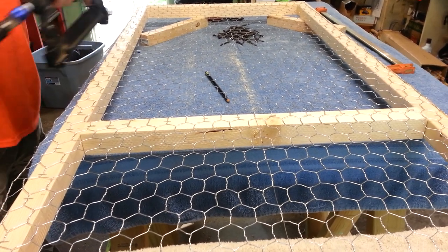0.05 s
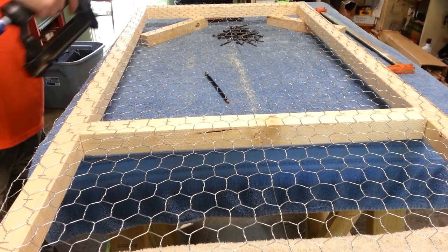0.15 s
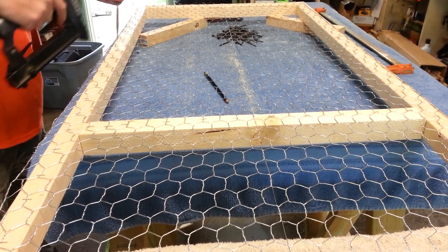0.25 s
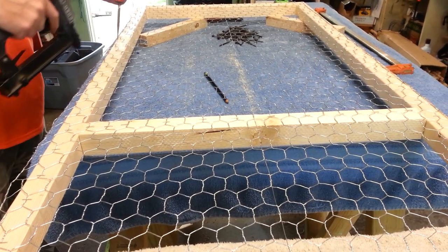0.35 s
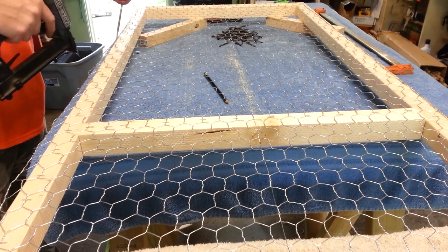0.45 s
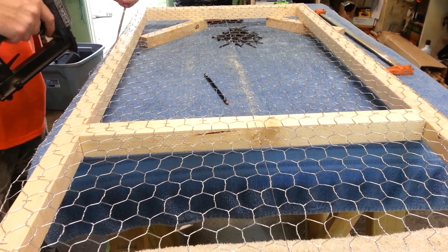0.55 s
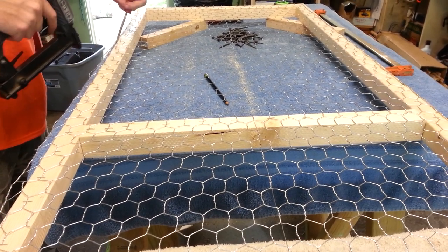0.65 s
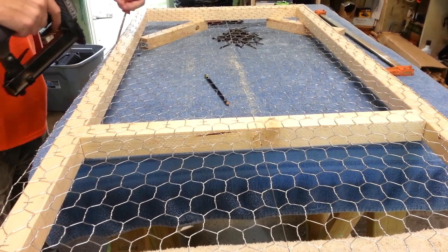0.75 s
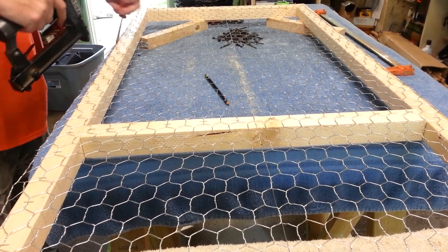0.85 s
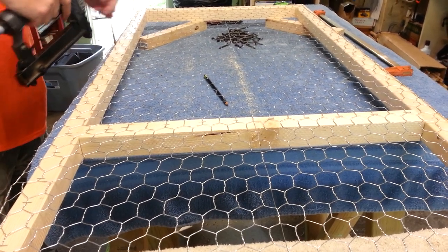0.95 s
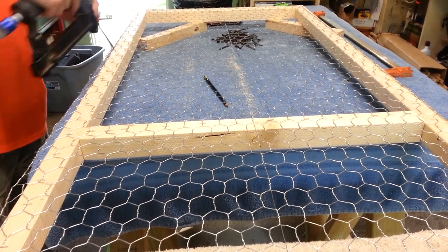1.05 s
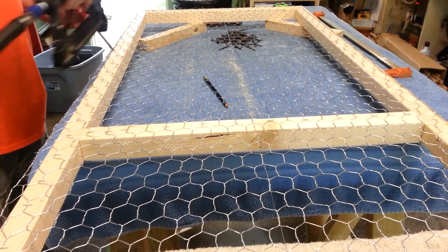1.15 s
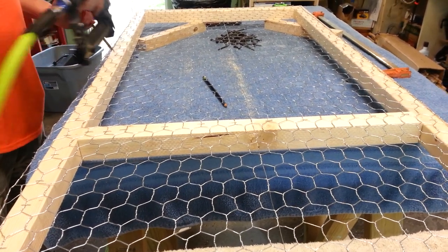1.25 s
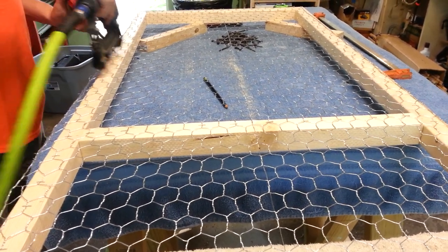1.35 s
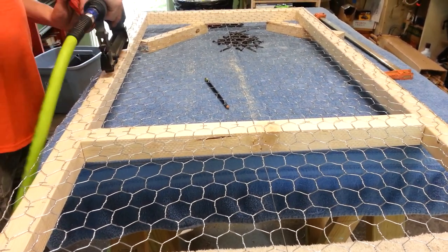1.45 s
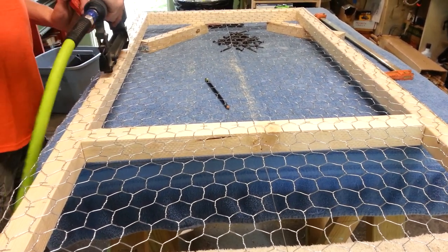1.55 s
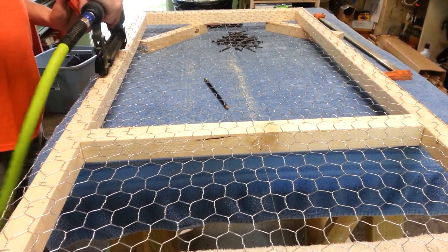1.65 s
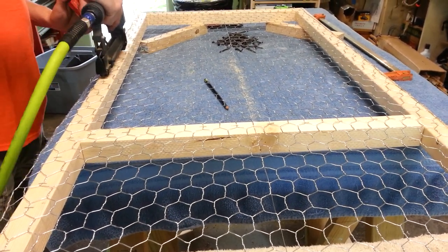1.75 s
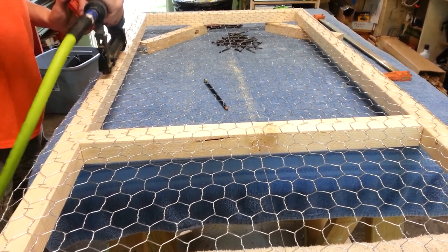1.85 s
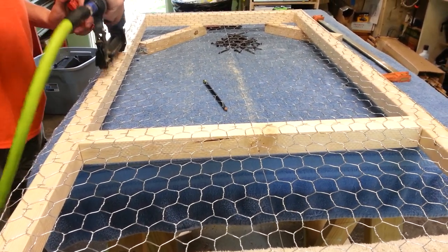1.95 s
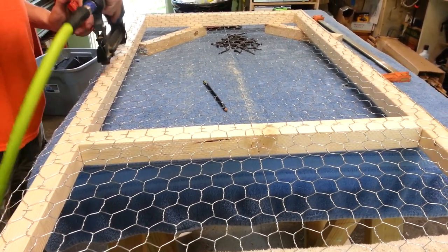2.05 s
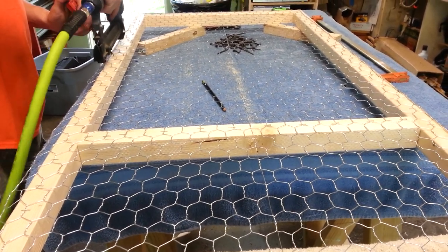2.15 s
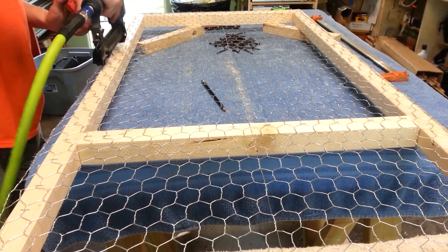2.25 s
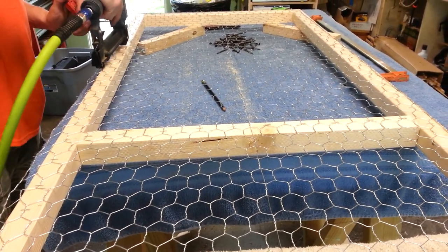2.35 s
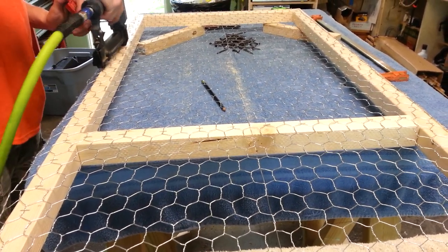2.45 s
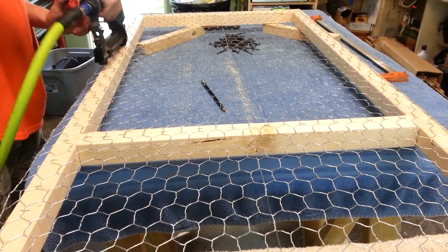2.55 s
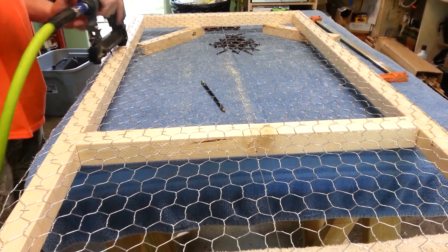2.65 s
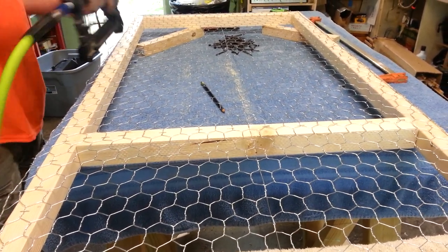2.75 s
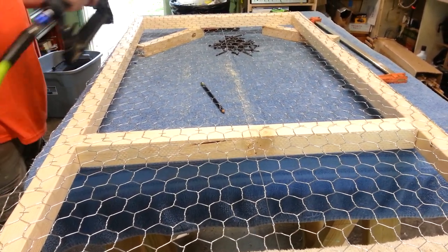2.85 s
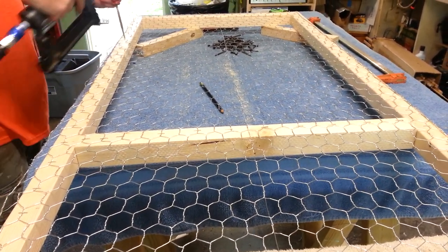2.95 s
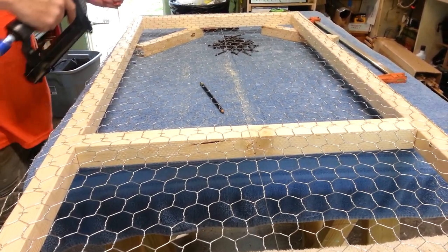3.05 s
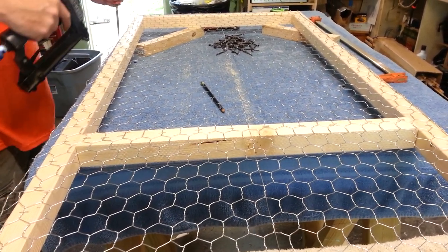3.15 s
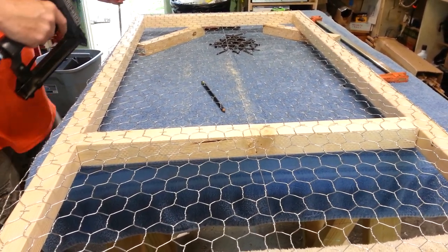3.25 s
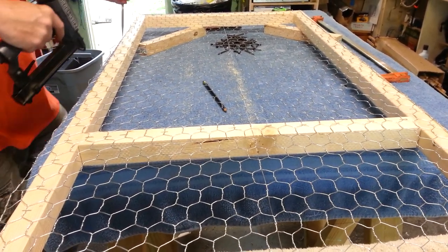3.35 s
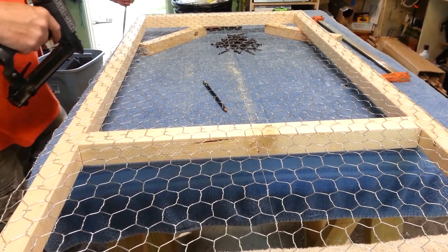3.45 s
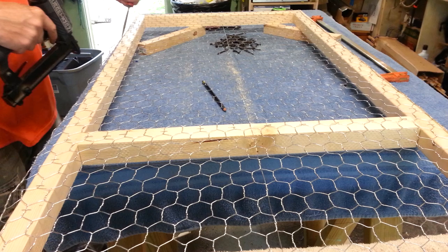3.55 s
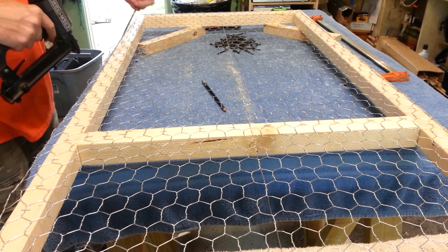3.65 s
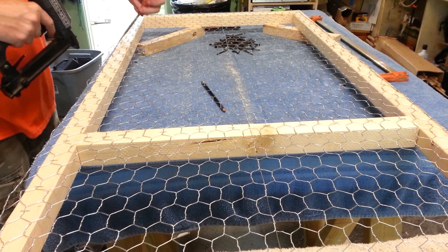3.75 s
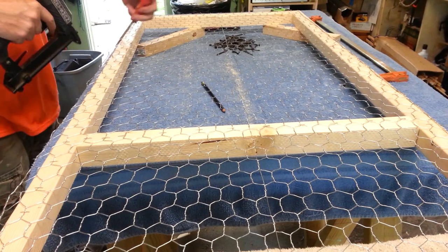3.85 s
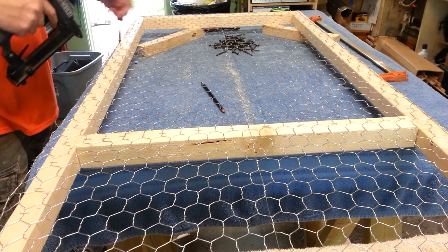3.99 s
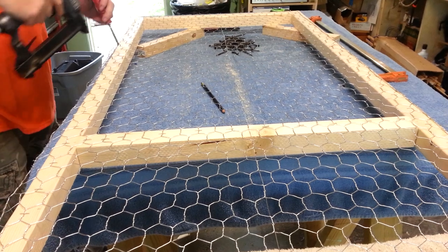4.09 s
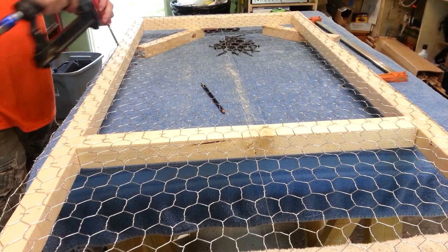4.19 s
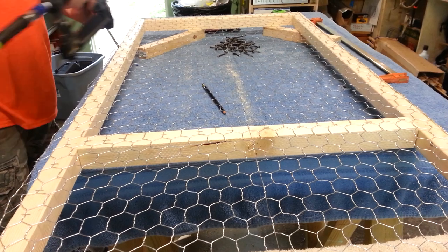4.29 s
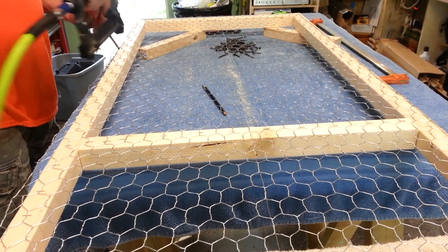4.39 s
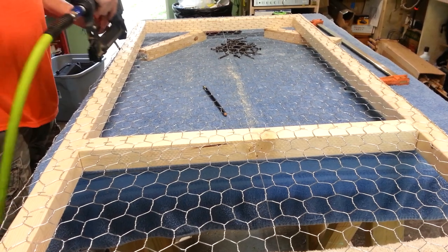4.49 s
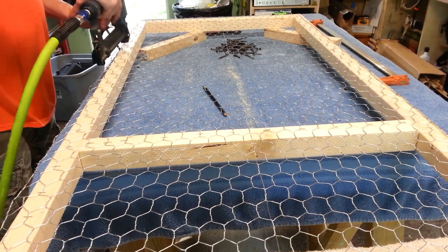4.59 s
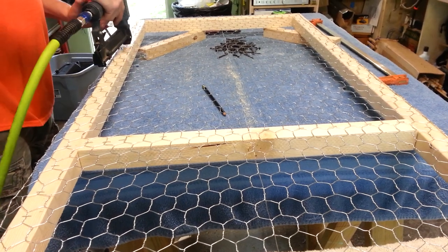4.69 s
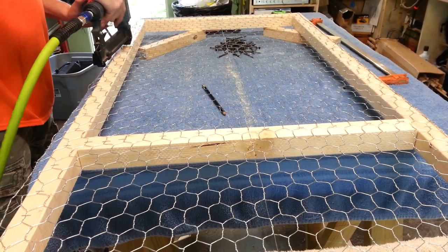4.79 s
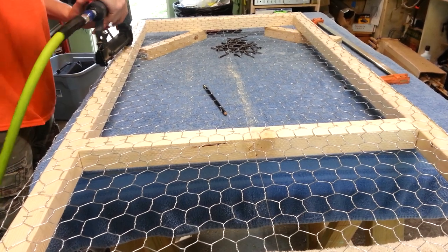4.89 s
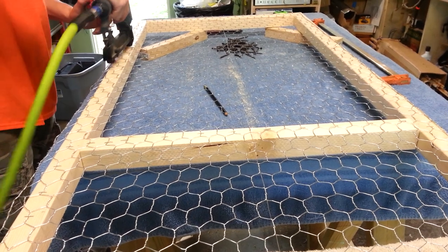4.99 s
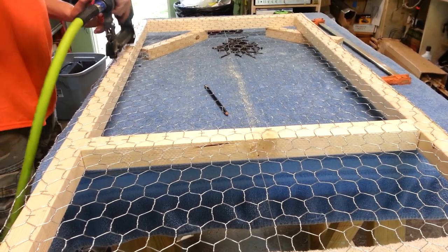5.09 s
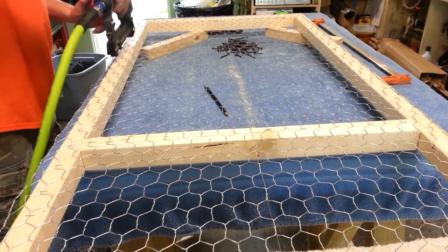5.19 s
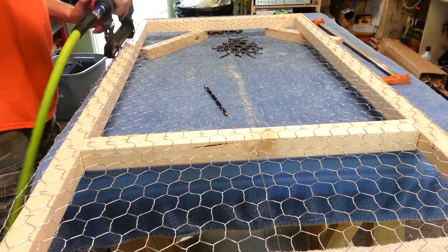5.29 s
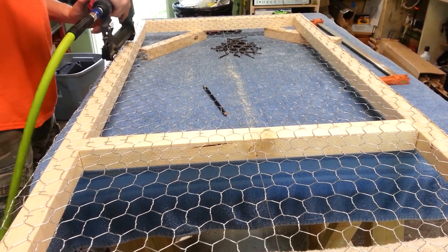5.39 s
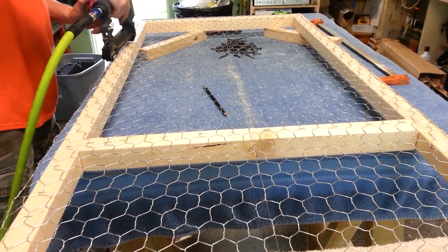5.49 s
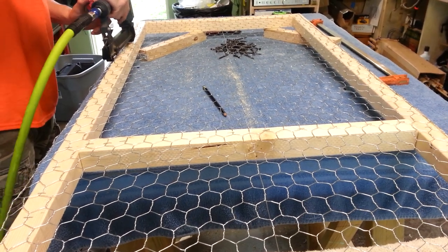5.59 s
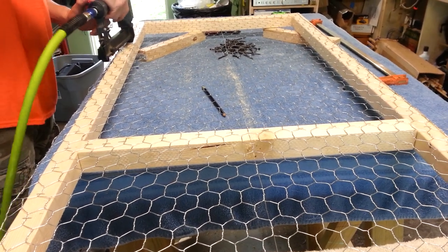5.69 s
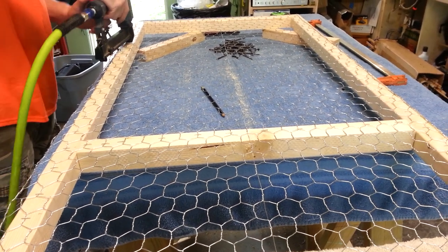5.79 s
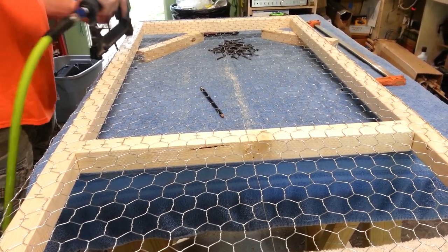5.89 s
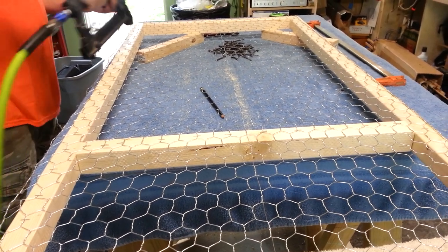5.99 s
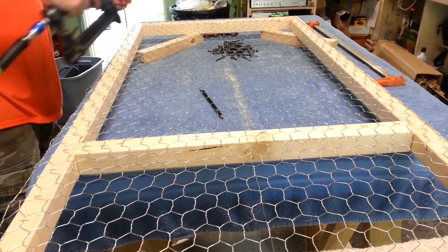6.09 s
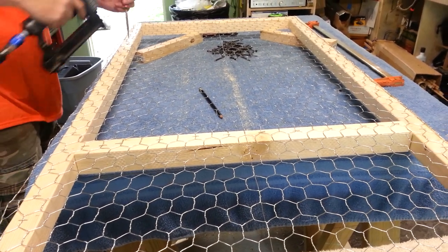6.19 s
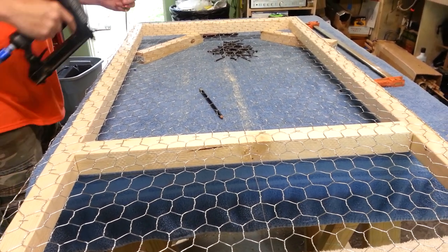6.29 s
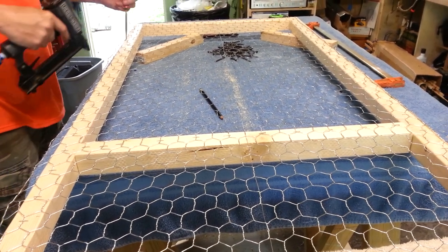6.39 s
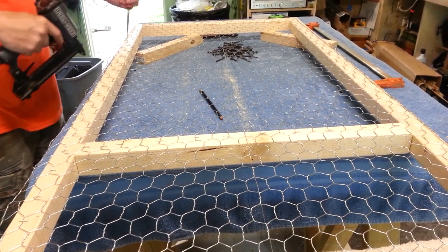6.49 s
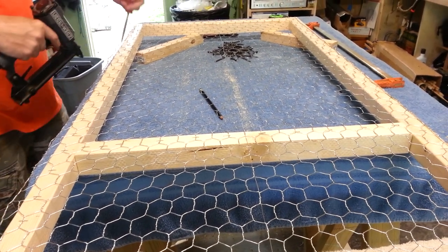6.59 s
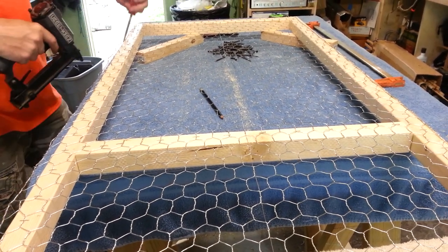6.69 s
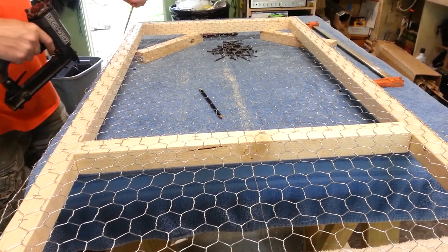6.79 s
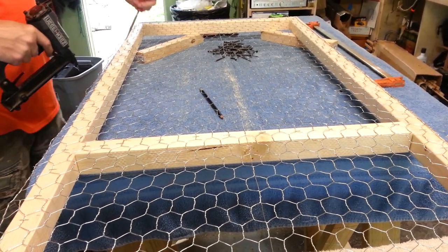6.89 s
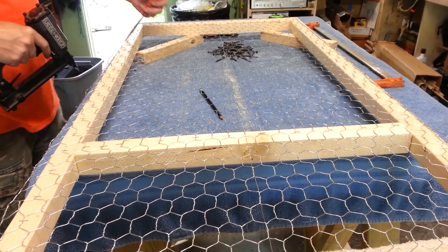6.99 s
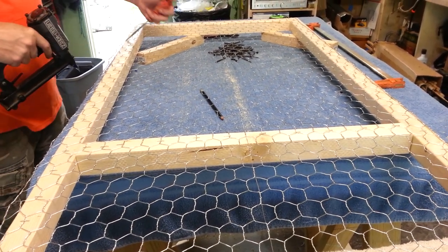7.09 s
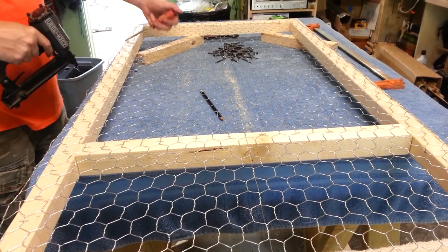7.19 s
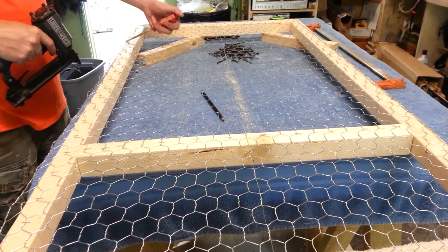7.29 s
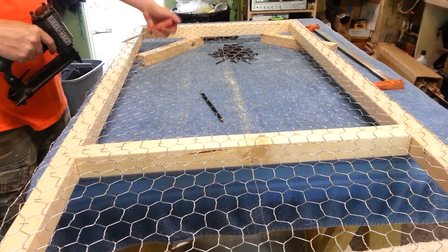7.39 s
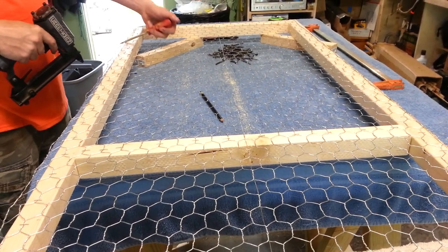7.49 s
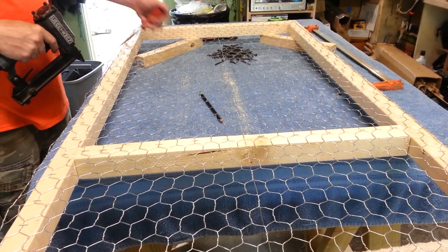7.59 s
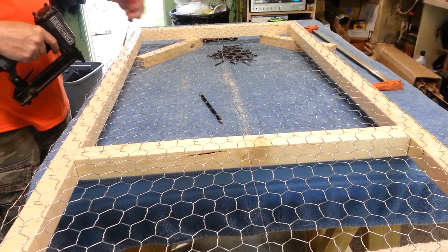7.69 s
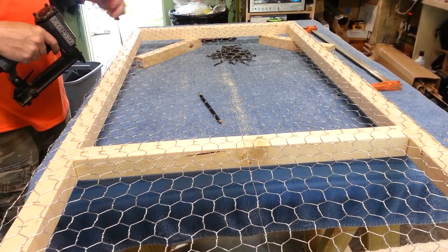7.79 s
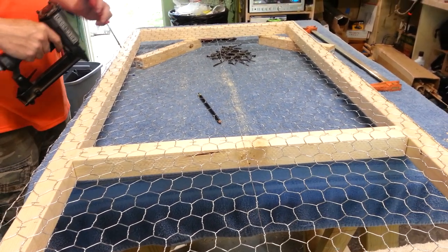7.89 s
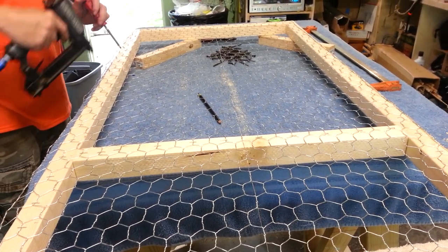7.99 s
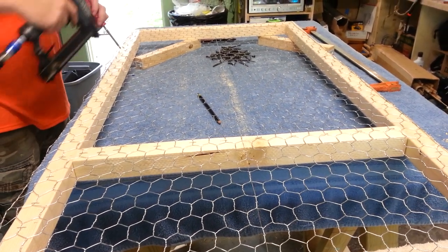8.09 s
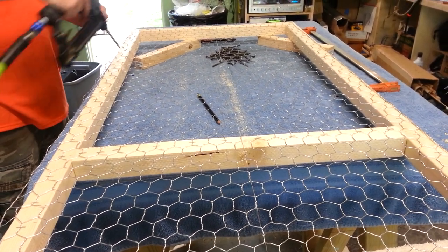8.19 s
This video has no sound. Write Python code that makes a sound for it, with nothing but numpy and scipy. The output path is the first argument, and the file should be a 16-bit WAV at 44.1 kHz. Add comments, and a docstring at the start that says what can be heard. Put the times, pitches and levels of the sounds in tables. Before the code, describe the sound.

A light click and a soft scrape of chicken wire on wood come first. An air stapler then fires two loud shots, each a hard metallic bang followed by a clack and a puff of air. The wire rasps as it is pulled tight, two more shots follow, and the mesh slips again near the end. The small workshop echoes briefly over a faint low drone, with the work slightly left of a stereo microphone.

```python
"""A light click and the scrape of chicken wire come first, then an air stapler bangs four times. It is tacking
the wire to a wooden frame in a small workshop, a little left of a stereo microphone. Each shot is a spit of the
valve, a blow so loud it clips, then a clack and a puff of air as the piston returns. Between shots the mesh is
pulled tight, slipping and rasping over the wood, a pry tool knocks on the frame, and the tool clicks as it is
handled. The timber rings, the room echoes, and a low drone lies underneath."""
import sys
import numpy as np
from scipy import signal
from scipy.fft import rfft, irfft
from scipy.io import wavfile
from scipy.ndimage import uniform_filter1d

SR = 44100
rng = np.random.default_rng(int(sys.argv[2]) if len(sys.argv) > 2 else 0)


def store_pcm(level_fs):
    """Save levels as 16-bit WAV."""
    pcm = np.round(np.clip(level_fs, -1, 1) * 32767).astype(np.int16)
    wavfile.write(sys.argv[1], SR, np.atleast_2d(pcm).T)


N = 363384

# When each staple goes in: nose_press_s, blow_s, piston_return_s
SHOTS = [(1.820, 1.9082, 2.0168), (2.489, 2.5592, 2.6686), (4.893, 4.9828, 5.0928), (5.585, 5.7420, 5.8366)]
def stapler(lead_s=0.0156, seat_s=0.024):
    """Each shot spits, bangs and puffs; the piston clacks as it lets go and again as it seats."""
    out = np.zeros(N)
    for _, blow_s, return_s in SHOTS:
        add(out, blow_s - lead_s, at_level(valve(lead_s), db=-14))
        add(out, blow_s, at_level(blow(), db=5))
        add(out, return_s, at_level(exhaust(), db=-3.5))
        add(out, return_s, piston(clack_db=-9.5, thump_db=-9))
        add(out, return_s + seat_s, piston(clack_db=-4, thump_db=-15))
    return out


# The notes the stapler's metal body rings with: pitch_hz, level_db, fade_s
BODY_NOTES = [(470, -6.5, 0.064), (1040, 0.5, 0.12), (1297, -6, .12), (1390, -16, 0.34), (1920, 0.5, 0.22),
              (2010, 1, 0.21), (2250, 2, 0.25), (2485, -0.5, 0.24), (2615, 2.5, .19), (2796, -9, 0.43),
              (2860, -4, .19), (3090, -3.5, .17), (3828, -10, .17)]
# The tone of rattling steel parts: pitch_hz, level_db
STEEL_TONE = [(40, -43), (100, -27), (200, -22), (450, -24), (750, -20), (1200, -2), (1900, 2), (2700, 4.5),
              (4500, -9), (7000, -17), (14000, -23)]
def blow(contact_s=0.00015):
    """The driver hits staple and wood: one hard push, a rattle of parts, and the ring of the body."""
    t = clock(0.5)
    push = band(t / contact_s * np.exp(-t / contact_s), 440, 3000, order=1)
    rattle = colour(rng.standard_normal(len(t)) * fade(t, 0.18), STEEL_TONE)
    ring = 0
    for hz, db, fade_s in BODY_NOTES:
        louder, sharper, phase = rng.standard_normal(3)  # no two blows ring alike
        note = np.sin(2 * np.pi * hz * (1 + 0.0065 * sharper) * t + np.pi * phase)
        ring += amp(db + 2 * louder) * note * fade(t, fade_s)
    return at_level(rattle, db=0) + at_level(ring, db=-12) - at_level(push, db=-2)


# The tone of air spitting through the valve: pitch_hz, level_db
VALVE_TONE = [(100, -4), (500, -6), (900, -11), (2000, -2.5), (3200, 4.5), (4500, -11.5), (7000, -3),
              (14000, -7.5)]
def valve(lead_s, rise_s=0.0003):
    """The trigger valve spits while the cylinder fills."""
    t = clock(lead_s + 0.0012)
    opening = 1 - np.exp(-(t / rise_s) ** 2)
    return colour(rng.standard_normal(len(t)) * opening, VALVE_TONE)


# The tone of the escaping air: pitch_hz, level_db
EXHAUST_TONE = [(100, -21), (400, -14), (800, -10.5), (1500, -1), (3000, 3), (4400, 0), (5500, -7.5),
                (8000, -1), (14000, -6)]
def exhaust(rise_s=0.00053, hold_s=0.0048, empty_s=0.19):
    """The cylinder empties: a jet of air holds briefly, then dies with its pressure."""
    t = clock(0.4)
    pressure = rise(t, rise_s) * fade(np.maximum(t - hold_s, 0), empty_s)
    return colour(rng.standard_normal(len(t)) * pressure, EXHAUST_TONE)


# The tone of the piston's dull thump: pitch_hz, level_db
THUMP_TONE = [(40, -19.5), (90, -9), (150, 0.5), (210, 0), (300, -6), (420, -4.5), (800, -18),
              (3000, -26.5)]
def piston(clack_db, thump_db):
    """The piston knocks and chatters briefly: a bright clack on top of a dull thump."""
    t = clock(0.2)
    knock = t == 0
    clack = colour(knock + amp(-13) * rng.standard_normal(len(t)) * fade(t, 0.02), STEEL_TONE)
    thump = colour(knock + amp(-30) * rng.standard_normal(len(t)) * fade(t, 0.015), THUMP_TONE)
    return at_level(clack, clack_db) + at_level(thump, thump_db)


# The tone of wire mesh on wood: pitch_hz, level_db
MESH_TONE = [(60, -28), (180, -6), (330, -4.5), (480, -2.5), (760, -5), (1100, 1), (1600, -0.5),
             (2300, -8.5), (3200, -2.5), (3800, -14), (4400, -10), (5500, -25), (9000, -29.5),
             (14000, -42.5)]
# Each slip of the wire, or knock of the pry tool on the frame: start_s, level_db, brightness_db_per_octave
SLIPS_AND_KNOCKS = [(.487, -34.5, 0.5), (.58, -38, -1.5), (.672, -34.5, -3.5), (.851, -26.5, 2),
                    (1.122, -42.5, 6), (3.428, -37, 4.5), (3.556, -34.5, 4), (3.637, -39.5, -0.5),
                    (3.673, -36.5, 0), (3.777, -28, 0.1), (3.825, -24, -0.5), (4.4, -42.5, 2),
                    (5.984, -23.5, 3.5), (6.957, -40, 0.5), (7.24, -29, 4), (7.253, -23, -2.5),
                    (7.433, -21.5, -1), (7.49, -28, -4), (7.691, -38, 1.5)]
def slips_and_knocks():
    """The tight wire slips and snaps against the frame, and the pry tool knocks on the timber."""
    return knocks(SLIPS_AND_KNOCKS, MESH_TONE, fade_s=0.088, rise_s=0.00054, spread_db=5.5)


# Each drag of the mesh over the wood: start_s, length_s, level_db
WIRE_RASPS = [(.64, 0.057, -39.5), (.86, 0.0472, -23), (3.837, 0.091, -19)]
def wire_rasps(rise_s=0.0018, swell_db_per_s=40, stop_s=0.23):
    """Twists of wire catch and let go on the timber, harder as the pull grows."""
    out, t = np.zeros(N), clock(0.35)
    for start_s, length_s, db in WIRE_RASPS:
        pull = rise(t, rise_s) * amp(swell_db_per_s * np.minimum(t, length_s))
        release = fade(np.maximum(t - length_s, 0), stop_s)
        rasp = colour(grains(t, spread_db=6) * pull * release, tilted(MESH_TONE, 0.3))
        add(out, start_s, at_level(rasp, db))
    return out


# The tone of small clicks and ticks: pitch_hz, level_db
CLICK_TONE = [(59, -14), (100, -9.5), (211, 1.5), (698, -8.5), (1250, -0.5), (1850, -8), (2620, -3),
              (4310, -11.5), (6790, -19.5), (14000, -22.5)]
# Each click of the tool in the hand: start_s, level_db, brightness_db_per_octave
TOOL_CLICKS = [(.002, -25.5, 0), (.286, -39, -3.5), (1.46, -30, 0.5), (1.834, -32.5, -1), (2.352, -41, 1),
               (2.366, -38, 5), (2.386, -37.5, 2.5), (3.047, -32.5, -5.5), (3.224, -38, -1),
               (3.525, -37.5, -3.5), (4.774, -36.5, -0.5), (5.383, -34, -2), (6.27, -39, -3.5),
               (6.931, -38, -4)]
def tool_clicks(nose_db=-34):
    """The tool clicks as it is handled, and as its nose meets the wood before each shot."""
    presses = [(press_s, nose_db, 0) for press_s, _, _ in SHOTS]
    return knocks(TOOL_CLICKS + presses, CLICK_TONE, fade_s=0.017, rise_s=0.00055, spread_db=4.5)


def mesh_rustle(level_db=(-48, -42), tilt_db=(-3, 3), count=50):
    """The loose mesh ticks faintly at random moments as it is handled."""
    ticks = [(rng.uniform(0, (N - 1) / SR), rng.uniform(*level_db), rng.uniform(*tilt_db))
             for _ in range(count)]
    return knocks(ticks, CLICK_TONE, fade_s=0.0386, rise_s=0.00068, spread_db=6)


# The notes the wooden frame rings with: pitch_hz, gain_db, fade_s
FRAME_NOTES = [(152.5, -7, .55), (205, 9, 1), (488, 4.5, 0.76)]
def with_frame(x, gain_db):
    """Every knock sets the timber ringing; return the sound together with that ring."""
    t, ring = clock(0.7), 0
    for hz, db, fade_s in FRAME_NOTES:
        dying = fade(t, fade_s)
        ring += amp(db) * np.sin(2 * np.pi * hz * t) * dying * 2 / dying.sum()
    return x + amp(gain_db) * signal.oaconvolve(x, ring)[:N]


# How long the room rings, from bass to treble: pitch_hz, fade_s
ROOM_FADES = [(120, 0.58), (400, 0.58), (1200, 0.44), (3000, 0.35), (6000, 0.29), (13000, 0.16)]
def room_echo(early_fade_s=0.13, tail_db=-6.5, build_s=0.0076):
    """Quick echoes off the bench and shelves, then the room's tail; the deep bass escapes."""
    t = clock(0.9)
    hz, fades_s = np.transpose(ROOM_FADES)
    log_hz = np.log(np.fft.rfftfreq(len(t), 1 / SR) + 1)
    spectrum, tail = rfft(all_around(len(t))), 0
    for share, fade_s in zip(np.eye(len(hz)), fades_s):  # each pitch range fades at its own speed
        tail += irfft(spectrum * np.interp(log_hz, np.log(hz), share), len(t)) * fade(t, fade_s)
    early = all_around(len(t)) * fade(t, early_fade_s) * (t > 0.001)
    parts = [(early, 0), (tail * rise(t, build_s), tail_db)]
    echo = sum(x * amp(db) / np.sqrt(np.sum(x ** 2) / 2) for x, db in parts)
    return band(echo, 120, SR / 2, order=2)


def workshop(sources):
    """Sounds reach the left ear first; their echoes change as the work moves along the frame."""
    out, to_room = 0, 0
    for x, lag_s, echo_db in sources:
        left = x / np.hypot(1, amp(echo_db))  # direct sound and echo share the energy
        right = np.pad(left, (int(lag_s * SR), 0))[:N]
        out += np.array([left, right])
        to_room += amp(echo_db) * left
    for share in np.eye(len(SHOTS)):  # one echo pattern per shot, blending into the next
        nearness = np.sqrt(np.interp(np.arange(N) / SR, [s for _, s, _ in SHOTS], share))
        out += signal.oaconvolve((to_room * nearness)[None], room_echo(), axes=1)[:, :N]
    return out


# The tone of the workshop's low drone: pitch_hz, level_db
DRONE_TONE = [(18, -73), (30, -44.5), (60, -28), (173, -6.5), (257, -14.5), (286, -15.5), (513, -15.5),
              (731, -17.5), (1430, -20.5), (2300, -19), (2720, -20.5), (4400, -23), (5720, -30)]
def background(drone_db=-48.5, waver_db=2, hiss_db=-59):
    """A low drone that wavers slightly, under a thin hiss."""
    drift = np.interp(np.arange(N), np.linspace(0, N, 60), rng.standard_normal(60))
    drone = np.array([colour(x, DRONE_TONE) for x in all_around(N)])
    drone = signal.sosfilt(signal.butter(8, 4600, fs=SR, output="sos"), drone)
    return drone / drone.std() * amp(drone_db + waver_db * drift) + amp(hiss_db) * all_around(N)


def knocks(rows, tone, fade_s, rise_s, spread_db):
    """Small knocks: each is a brief chatter with its own level and brightness."""
    out, t = np.zeros(N), clock(0.15)
    for start_s, db, tilt_db in rows:
        chatter = grains(t, spread_db) * rise(t, rise_s) * fade(t, fade_s)
        add(out, start_s, at_level(colour(chatter, tilted(tone, tilt_db)), db, samples=800))
    return out


def grains(t, spread_db):
    """Gritty noise: many tiny contacts of very unequal size."""
    x = rng.standard_normal(len(t)) * amp(spread_db * np.minimum(rng.exponential(size=len(t)), 5))
    return x / x.std()


def all_around(length, spacing_m=0.097):
    """Noise from all sides: left and right are alike in the bass, unrelated in the treble."""
    likeness = 0.75 * np.sinc(2 * np.fft.rfftfreq(length, 1 / SR) * spacing_m / 343)
    spectra = rfft(rng.standard_normal((2, length)))
    mid, side = irfft(spectra * np.sqrt([1 + likeness, 1 - likeness]), length)
    return np.array([mid + side, mid - side]) / np.sqrt(2)


def colour(x, tone, size=2048):
    """Turn each pitch of a sound up or down as a tone table says."""
    hz, db = np.transpose(tone)
    gain = amp(np.interp(np.log(np.fft.rfftfreq(size, 1 / SR) + 1), np.log(hz), db))
    cepstrum = irfft(np.log(gain))[:size // 2]  # one half only, so nothing rings before the hit
    cepstrum[1:] *= 2
    return signal.fftconvolve(x, irfft(np.exp(rfft(cepstrum, size))))[:len(x)]


def tilted(tone, tilt_db, low_hz=222, high_hz=4440):
    """The same tone, brighter or duller by tilt_db per octave."""
    return [(hz, db + tilt_db * np.log2(np.clip(hz, low_hz, high_hz) / low_hz)) for hz, db in tone]


def band(x, low_hz, high_hz, order):
    """Keep the pitches between two limits."""
    edges_hz = [low_hz, min(high_hz, SR / 2 - 1)]
    return signal.sosfilt(signal.butter(order, edges_hz, "band", fs=SR, output="sos"), x)


def amp(db):
    """Turn decibels into a multiplier."""
    return 10 ** (np.asarray(db) / 20)


def clock(seconds):
    """The time of each sample."""
    return np.arange(int(seconds * SR)) / SR


def rise(t, rise_s):
    """Climb from 0 towards 1."""
    return 1 - np.exp(-t / rise_s)


def fade(t, fade_s):
    """Die away by 60 dB in fade_s."""
    return np.exp(-np.log(1000) * t / fade_s)


def at_level(x, db, samples=220):
    """Scale a sound so its loudest short stretch has this level."""
    return x * amp(db) / np.sqrt(uniform_filter1d(x ** 2, samples).max())


def add(track, start_s, x):
    """Mix a sound into a track."""
    i = max(int(start_s * SR), 0)
    track[i:i + len(x)] += x[:N - i]


def scene():
    """Shots, wire and clicks, each with the frame ringing under it, in the workshop."""
    shots = with_frame(stapler(), gain_db=-10)
    wire = with_frame(slips_and_knocks() + wire_rasps() + mesh_rustle(), gain_db=0)
    clicks = with_frame(tool_clicks(), gain_db=-10)
    # sound, right_side_lag_s, echo_db
    sources = [(shots, 0.00017, -1), (wire, 0.00022, 5.5), (clicks, 0.00017, 7)]
    return background() + workshop(sources)


# How the microphone's two sides differ: pitch_hz, left_minus_right_db
MIC_BALANCE = [(500, -0.2), (1200, 0.5), (2000, -6), (4000, -1.5), (8000, 4.5), (12500, 4)]
def record(dry, top_hz=14700):
    """The sound is brighter on the left, the loud blows clip, and the highest treble is cut."""
    tones = [[(hz, side * db / 2) for hz, db in MIC_BALANCE] for side in (1, -1)]
    stereo = np.array([colour(x, tone) for x, tone in zip(dry, tones)])
    clipped = stereo / (1 + np.abs(stereo) ** 8) ** (1 / 8)
    return signal.sosfilt(signal.ellip(8, 0.2, 70, top_hz, fs=SR, output="sos"), clipped)


dry = scene()
out = record(dry)
store_pcm(out)
```